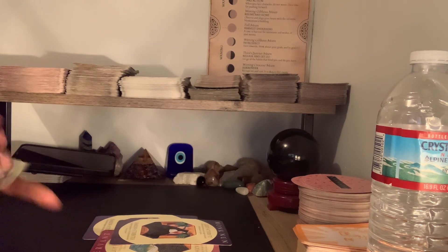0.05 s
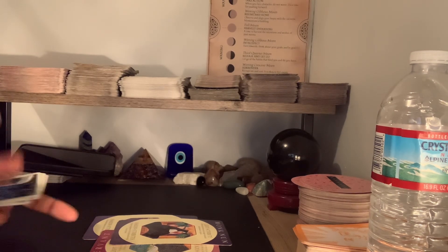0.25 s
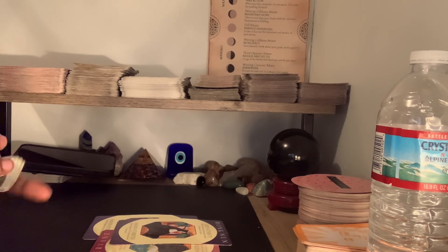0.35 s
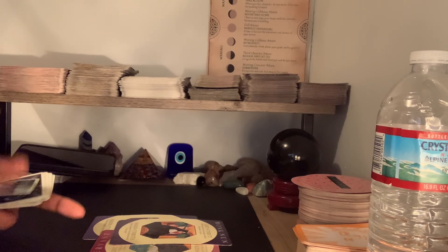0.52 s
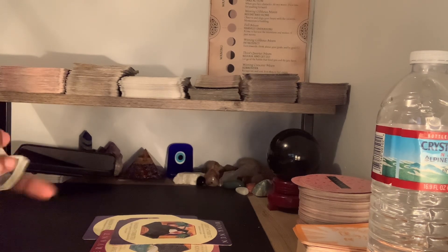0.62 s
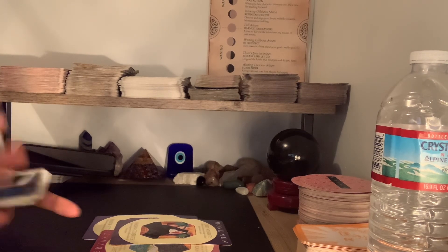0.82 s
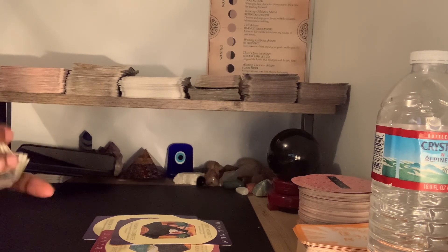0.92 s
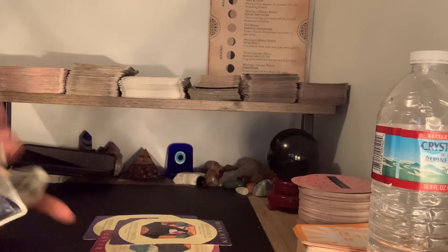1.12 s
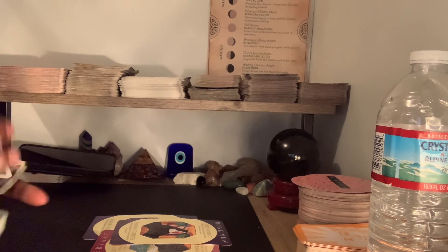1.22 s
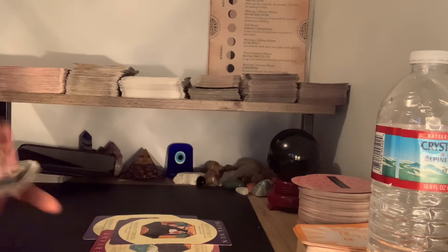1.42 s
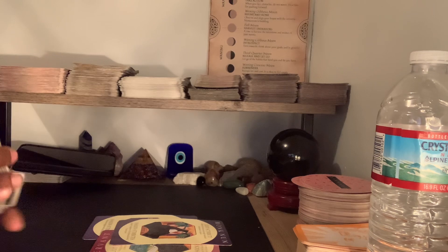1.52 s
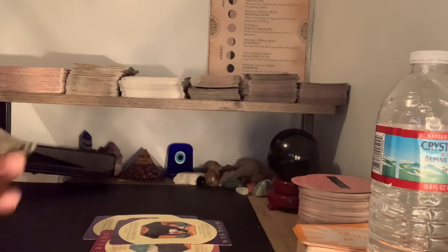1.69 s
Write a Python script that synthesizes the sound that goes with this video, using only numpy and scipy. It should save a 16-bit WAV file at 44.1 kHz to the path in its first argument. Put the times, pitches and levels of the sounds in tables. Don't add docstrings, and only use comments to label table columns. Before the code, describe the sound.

Close stereo pickup of hands shuffling playing cards indoors, packets clacking about four catches a second with short hisses and double claps between, a sharp rap after one second, then faint taps and quiet air.

```python
import sys
import numpy as np
from scipy import signal
from scipy.fft import rfft, irfft, next_fast_len
from scipy.io import wavfile
from scipy.ndimage import map_coordinates

SR = 44100
rng = np.random.default_rng(int(sys.argv[2]) if len(sys.argv) > 2 else 0)


def materialize(psi):
    bounded = np.clip(np.atleast_2d(psi).T, -1, 1)
    quanta = np.round(bounded * 32767).astype(np.int16)
    wavfile.write(sys.argv[1], SR, quanta)


def rack_gain(trim_db):
    fader = np.asarray(trim_db, float)
    return 10 ** (fader / 20)


N = 77175

# (frequency [Hz], level [dB])
AIR_SPECTRUM = [(120, -21.5), (200, -4), (3900, -3.5), (4950, -23.5), (5940, -11), (11300, -16.5),
                (13100, -29), (13800, -13.5), (16000, -32)]
# (time [s], level [dB])
AIR_LEVEL = [(0, -52.5), (0.041, -58.5), (1.4, -67), (1.601, -69), (1.75, -82.5)]
# (frequency [Hz], level [dB])
RUMBLE_SPECTRUM = [(20, -10.5), (50, 11), (150, -9.5), (350, -24), (700, -34)]
# (time [s], peak level [dB], edge crack re peak [dB], air pocket [Hz], flutter T60 [s])
CATCHES = [(0.052, -25.5, -16.5, 1100, 0.11), (0.061, -21, -22, 780, 0.037), (0.073, -19.5, -36, 1360, 0.1),
           (0.096, -21.5, -15.5, 1290, 0.079), (0.323, -15, -8.5, 1180, 0.024),
           (0.328, -12.5, -41, 660, 0.021), (0.334, -16, -10, 950, 0.071), (0.342, -20, -22, 1200, 0.13),
           (0.595, -18, -8, 950, 0.025), (0.604, -16, -14.5, 730, 0.095), (0.611, -12.5, 2.5, 1050, 0.034),
           (0.621, -11, -9.5, 1530, 0.036), (0.865, -19, -16, 824, 0.16), (0.8775, -19, -6, 1900, 0.064),
           (0.884, -22, -6, 1890, 0.07), (0.891, -12.5, -10.5, 1180, 0.037),
           (1.137, -17.5, -8.5, 1250, 0.2), (1.155, -16, 1, 915, 0.0226), (1.162, -1, -60, 1990, 0.042),
           (1.172, -5, -28, 1070, 0.038), (1.427, -22.5, -12, 820, 0.11), (1.437, -19, -32, 907, 0.049),
           (1.44, -10.5, -12, 990, 0.082), (1.45, -24.5, -10, 1180, 0.039)]
# (time [s], peak level [dB], edge crack re peak [dB], air pocket [Hz],
# flutter T60 [s])
LANDINGS = [(0.193, -22, -9, 1100, 0.13), (0.203, -19, -19, 950, 0.018), (0.219, -21, 7.5, 1170, 0.062),
            (0.225, -10.5, -18, 1130, 0.048), (0.469, -23, -4, 2300, 0.049), (0.475, -12.5, -8, 760, 0.026),
            (0.492, -16, -7.5, 2500, 0.065), (0.493, -6, -11, 1050, 0.043), (0.745, -20.5, -9, 2360, 0.053),
            (0.76, -18, -23.5, 1150, 0.034), (0.776, -3.5, -6.5, 1225, 0.033), (0.8, -33, -23, 1180, 0.04),
            (1.044, -12, -3.5, 1290, 0.053), (1.048, -36, -1, 1260, 0.03), (1.061, -26, -21.5, 1240, 0.073),
            (1.068, -15.5, -27, 1030, 0.031), (1.078, -16, -24.5, 754, 0.031),
            (1.209, -26, -21, 2000, 0.054), (1.29, -15, -8, 2540, 0.058), (1.296, -12.5, -10, 920, 0.058),
            (1.312, -10, -9, 1540, 0.04), (1.405, -39.5, -8, 920, 0.036), (1.518, -33, -8.5, 1480, 0.077),
            (1.632, -42, -19.5, 668, 0.044)]
# (frequency [Hz], level [dB])
CRACK_SPECTRUM = [(300, -30), (1500, 1), (2800, -2), (3900, 8), (5000, 8.5), (7500, -3), (11000, 3.5),
                  (15500, -13)]
# (frequency [Hz], level [dB])
DECK_SPECTRUM = [(150, -11), (450, -11.5), (700, -11), (1200, -8), (1900, -8.5), (2600, -10.5),
                 (4000, -13.5), (6000, -20)]
# (time [s], ring level [dB], ring [Hz], fizz level [dB])
SNAPS = [(0.0533, -29, 820, -39), (0.0750, -24, 1410, -41), (0.0813, -23, 1310, -45),
         (0.0970, -29, 1710, -33), (0.1575, -41, 3750, -31), (0.2040, -21, 3550, -25),
         (0.2049, -17, 1010, -41), (0.2197, -17, 1510, -18), (0.2229, -23, 3800, -10),
         (0.2249, -21, 3800, -15), (0.2259, -19, 1110, -18), (0.2329, -23, 1210, -29),
         (0.3287, -18, 810, -29), (0.3341, -15, 3950, -9), (0.3361, -17, 910, -31),
         (0.3413, -22, 3650, -35), (0.4764, -20, 910, -31), (0.4956, -12, 1210, -21),
         (0.4994, -17, 1210, -24), (0.5954, -24, 3750, -29), (0.6059, -21, 810, -37),
         (0.6121, -13, 3800, -17), (0.6137, -17, 1110, -31), (0.6207, -22, 1410, -27),
         (0.7619, -20, 1110, -29), (0.7777, -16, 3100, -16), (0.7789, -12, 1240, -29),
         (0.7817, -17, 1240, -20), (0.8654, -26, 3750, -41), (0.8781, -9, 3800, -15),
         (0.8916, -18, 3800, -20), (1.0442, -19, 3800, -16), (1.0481, -19, 3800, -22),
         (1.0606, -22, 1210, -35), (1.0696, -22, 1060, -32), (1.1373, -21, 3850, -17),
         (1.1519, -30, 3850, -27), (1.1557, -17, 3550, -14), (1.1585, -10, 1110, -31),
         (1.1629, -8, 2250, -20), (1.1669, -13, 1910, -19), (1.2979, -13, 3800, -33),
         (1.2991, -19, 1010, -37), (1.3063, -22, 1210, -37), (1.3136, -12, 3700, -17),
         (1.4311, -27, 910, -28), (1.4385, -18, 910, -35), (1.4417, -17, 3800, -16),
         (1.4427, -17, 1310, -31), (1.5196, -32, 3800, -33)]
# (frequency [Hz], level [dB])
FIZZ_SPECTRUM = [(1500, -25), (3500, -4), (7000, 0), (10000, 0), (12500, 0), (14500, 5), (16500, 5)]
# (time [s], level [dB], pitch [Hz])
THUDS = [(0.059, -36, 109), (0.101, -37.5, 150), (0.222, -30.5, 105), (.325, -28, 133), (0.498, -36.5, 95),
         (0.603, -65, 170), (0.634, -35, 136), (0.78, -32, 86), (.89, -32.5, 127), (0.944, -37.5, 120),
         (1.042, -41, 100), (1.111, -32, 55), (1.164, -29, 198), (1.315, -37.5, 102), (1.43, -54.5, 141),
         (1.529, -43, 150)]
# (start [s], end [s], level at end [dB], swell over the stroke [dB])
SLIDES = [
    (0.134, 0.234, -43.5, 8),
    (0.375, 0.449, -46, 10),
    (0.667, 0.771, -38.5, 17),
    (0.94, 1.043, -38, 20.5),
    (1.241, 1.299, -41.5, 7),
    (1.47, 1.542, -71, -15),
    (1.628, 1.694, -67.5, -4.5),
]
# (frequency [Hz], level [dB])
HISS_SPECTRUM = [(88, -53), (150, -3), (979, 1.5), (1720, -1.5), (3770, 3.5), (4760, 1.5), (11000, -5),
                 (12400, 1), (16000, -2)]
# (frequency [Hz], level [dB], T60 [s])
KNOCK_MODES = [
    (1140, -5.5, 0.089),
    (1883, 4.5, 0.06),
]
# (frequency [Hz], T60 [s])
ROOM_T60 = [(150, 0.28), (1000, 0.17), (4000, 0.18), (12000, 0.15)]
# (frequency [Hz], level difference [dB])
LEFT_OVER_RIGHT = [(60, 2.5), (380, 2), (700, 11), (1300, 4.5), (2400, 2.5), (4400, 5), (8100, 2),
                   (11500, 0)]
# (frequency [Hz], phase [rad])
LEFT_LEADS = [(1400, 0), (2000, .9), (3600, -.4), (4800, 2.9), (5250, 3.4), (9400, 7.3), (11400, 9.42),
              (13700, 9.42), (14600, 12.57)]
# (frequency [Hz], correlation [0-1])
PORT_LIKENESS = [(150, .88), (450, .5), (1300, .8), (3000, .45), (4800, .94), (5300, .94), (7000, .5),
                 (11300, .9995), (16000, .9995)]


def unit(x):
    return x / np.sqrt(np.mean(x ** 2) + 1e-20)


def along(points, hz):
    f, value = np.transpose(points)
    return np.interp(np.log(hz + 1), np.log(f + 1), value)


def filtered(x, response):
    size = next_fast_len(x.shape[-1] + 4096)
    spectrum = rfft(x, size) * response(np.fft.rfftfreq(size, 1 / SR))
    return irfft(spectrum, size)[..., :x.shape[-1]]


def tinted(points, size):
    white = rng.standard_normal((2, size))
    return unit(filtered(white, lambda hz: rack_gain(along(points, hz))))


def grainy(rate, depth_db, size):
    knots = rng.standard_normal(size // 8)
    return rack_gain(depth_db * map_coordinates(knots, [np.arange(size) * rate / SR], order=1))


def air():
    hush_db = np.interp(np.arange(N) / SR, *np.transpose(AIR_LEVEL))
    lumps = grainy(14, 3, size=N)
    tone = rack_gain(hush_db) * tinted(AIR_SPECTRUM, size=N)
    rumble_gain = rack_gain(-58 + 0.59 * (hush_db + 66.5)) * lumps
    return tone + rumble_gain * tinted(RUMBLE_SPECTRUM, size=N)


def slaps(rows, attack_s):
    out, t = np.zeros((2, N + SR)), np.arange(SR // 6) / SR
    rise = (1 - np.exp(-t / attack_s)) ** 2
    pocket_q, crack_share = 6, 0.71
    for s, db, crack_db, hz, t60 in rows:
        flutter = rise * rack_gain(-60 * t / t60) * grainy(893, 5, size=len(t))
        crack = rise * rack_gain(-60 * t / (t60 * crack_share)) * grainy(1556, 5, size=len(t))

        tilt_db = 0.12 * (min(crack_db, -2) + 10)
        edge = [(f, g + tilt_db * np.log2(f / 4000)) for f, g in CRACK_SPECTRUM]

        def resonance(f):
            damping = 1j * f * hz / pocket_q
            return damping / (hz * hz - f * f + damping)

        pocket = filtered(flutter * rng.standard_normal((2, len(t))), resonance)
        pocket = pocket / np.abs(pocket).max(axis=1)[:, None]
        slap = rack_gain(-11.5) * pocket
        slap = slap + rack_gain(-13) * flutter * tinted(DECK_SPECTRUM, size=len(t))
        slap = slap + rack_gain(crack_db - 1.5) * crack * tinted(edge, size=len(t))
        out[:, round(s * SR):][:, :len(t)] += rack_gain(db) * slap
    return out[:, :N]


def snaps():
    out, t = np.zeros((2, N + SR)), np.arange(SR // 40) / SR
    rise = 1 - np.exp(-t / 0.0002)
    cycles_to_60_db, fizz_t60 = 13, 0.007
    for s, db, hz, fizz_db in SNAPS:
        ring = rack_gain(db - 60 * t * hz / cycles_to_60_db) * np.sin(2 * np.pi * hz * t)
        ring = ring * [[1], [.2]]
        fizz = rack_gain(fizz_db - 60 * t / fizz_t60) * tinted(FIZZ_SPECTRUM, size=len(t))
        out[:, round(s * SR):][:, :len(t)] += rise * (ring + fizz)
    return out[:, :N]


def thuds():
    out, t = np.zeros(N + SR), np.arange(SR // 5) / SR
    t60, rise_s, sag_s = 0.056, 0.0059, 0.0043
    for s, db, hz in THUDS:
        cycles = hz * (t + 0.0035 * (1 - np.exp(-t / sag_s)))
        envelope = rack_gain(db + 3.5 - 60 * t / t60) * (1 - np.exp(-t / rise_s))
        out[round(s * SR):][:len(t)] += envelope * np.sin(2 * np.pi * cycles)
    return out[:N]


def slides():
    t, stroke = np.arange(N) / SR, np.zeros(N)
    edge_s = 0.021
    for start, end, db, swell_db in SLIDES:
        swell = rack_gain(db + swell_db * np.clip((t - end) / (end - start), -2, 0))
        stroke += swell * np.clip(np.minimum(t - start, end - t) / edge_s + 1, 0, 1)
    grains = grainy(660, 3.6, size=N) * grainy(64.1, 1.2, size=N)
    return stroke * unit(grains * tinted(HISS_SPECTRUM, size=N))


def knock():
    out, t = np.zeros((2, N)), np.arange(SR // 8) / SR
    knock_s, knock_db = 1.161, -11
    rise = 1 - np.exp(-t / 0.00039)
    for hz, db, t60 in KNOCK_MODES:
        waver = np.cumsum(0.06 * rng.standard_normal((2, len(t))), axis=1)
        mode = np.sin(2 * np.pi * hz * t + waver)
        out[:, round(knock_s * SR):][:, :len(t)] += rack_gain(knock_db + db - 60 * t / t60) * rise * mode
    return out


def room(x):
    out, step = np.zeros((2, N + SR)), SR // 50
    delay = 90
    for a in range(0, N, step):
        hz, t, z = signal.stft(rng.standard_normal((2, SR // 4)), SR, nperseg=128)
        decay = rack_gain(-60 * t / along(ROOM_T60, hz)[:, None])
        tail = signal.istft(z * decay, SR, nperseg=128)[1]
        wet = signal.fftconvolve(x[:, a:a + step], tail / np.linalg.norm(tail[0]), axes=1)
        out[:, a + delay:a + delay + wet.shape[1]] += wet
    return out[:, :N]


def ports(pair, top_alike):
    side = np.array([[.5], [-.5]])

    def strands(hz):
        limit = np.where(hz > 8000, top_alike, 1)
        turn = np.arccos(np.minimum(along(PORT_LIKENESS, hz), limit)) / 2
        return np.array([np.cos(turn), np.sin(turn)])

    def port_response(hz):
        lead = np.interp(hz, *np.transpose(LEFT_LEADS))
        return rack_gain(side * along(LEFT_OVER_RIGHT, hz)) * np.exp(1j * side * lead)

    same, apart = filtered(pair, strands)
    return filtered(same + 2 * side * apart, port_response)


def scene():
    hits = slaps(CATCHES, attack_s=0.00075) + slaps(LANDINGS, attack_s=0.0011)
    hits = hits + knock() + snaps() + thuds() * [[1], [0]]
    rub = slides()
    far = rub + room(rack_gain(-10) * hits + rack_gain(8) * rub) + air()
    return ports(hits, top_alike=0.9) + ports(far, top_alike=1)


def low_pass(x):
    return signal.sosfilt(signal.butter(12, 16980, fs=SR, output="sos"), x)


def record(dry):
    def microphone(hz):
        bass_cut = (1j * hz / (46.4 + 1j * hz)) ** 3
        treble_shelf = rack_gain(-36 * (hz > 15850))
        return (hz < 16900) * treble_shelf * bass_cut

    mix = filtered(dry, microphone)
    return low_pass(mix)


dry = scene()
out = record(dry)
materialize(out)
```